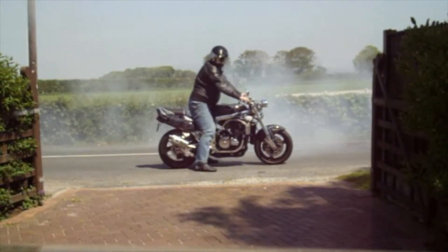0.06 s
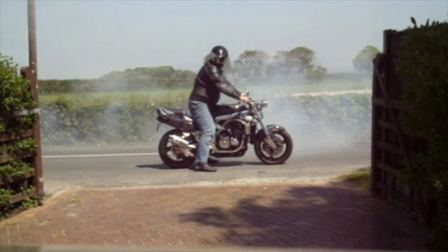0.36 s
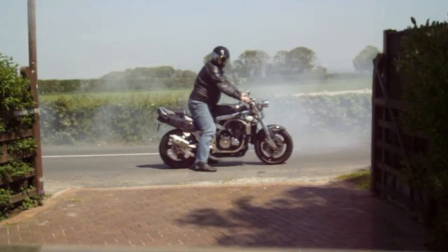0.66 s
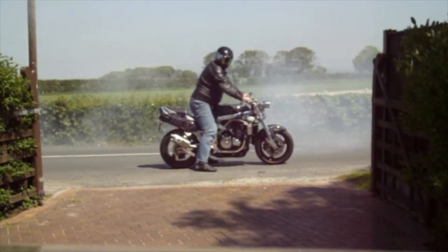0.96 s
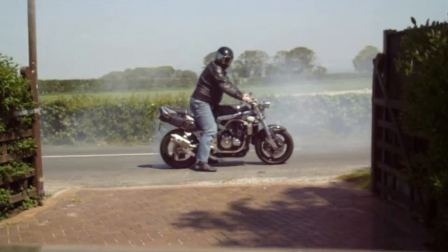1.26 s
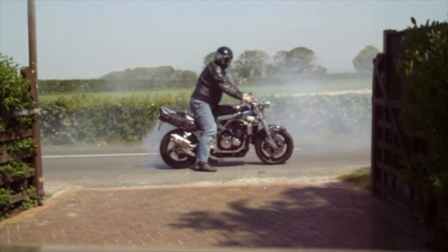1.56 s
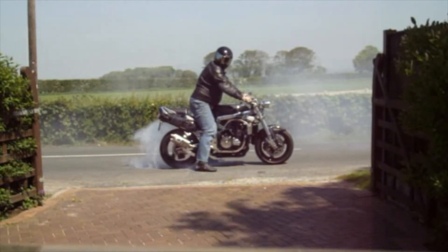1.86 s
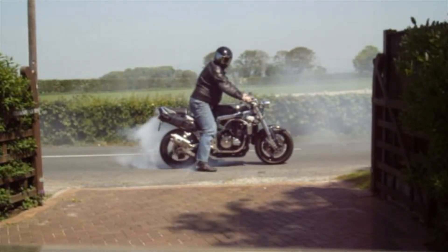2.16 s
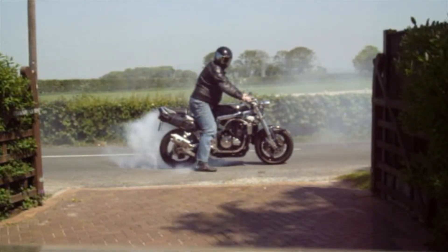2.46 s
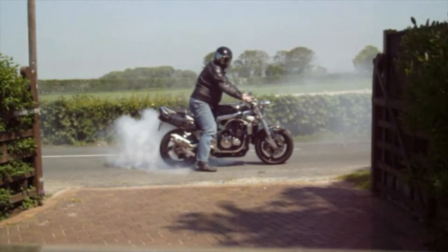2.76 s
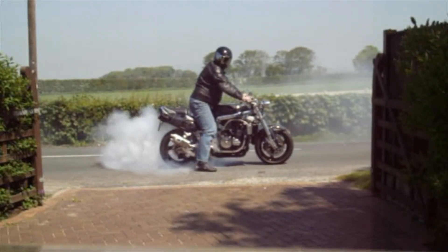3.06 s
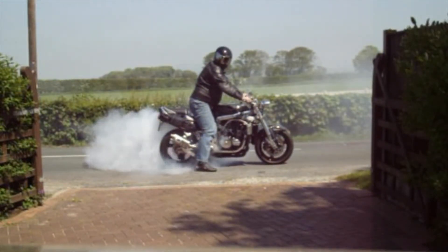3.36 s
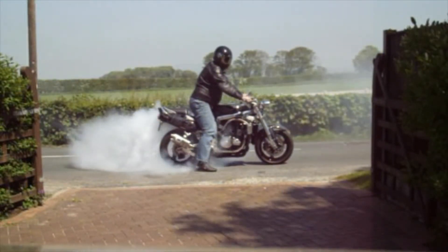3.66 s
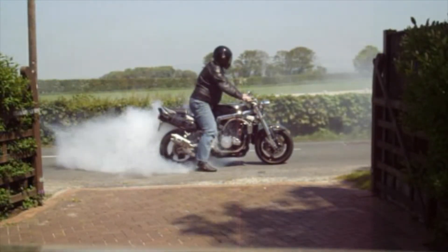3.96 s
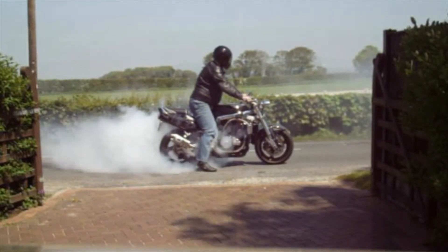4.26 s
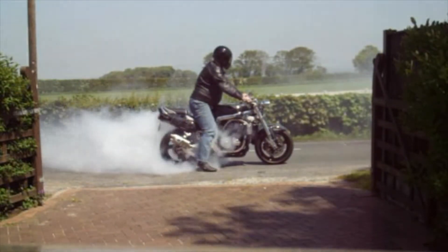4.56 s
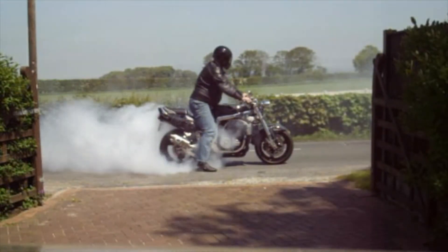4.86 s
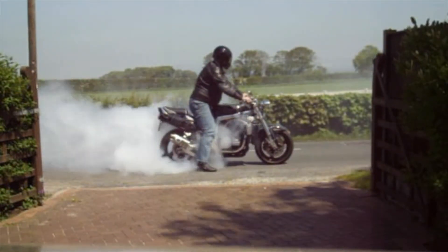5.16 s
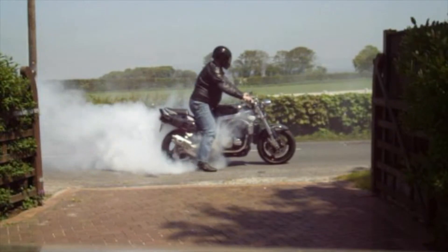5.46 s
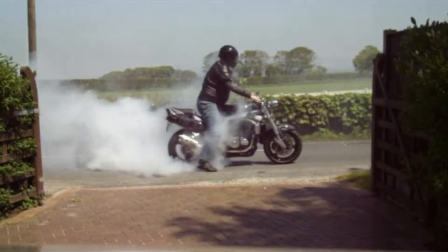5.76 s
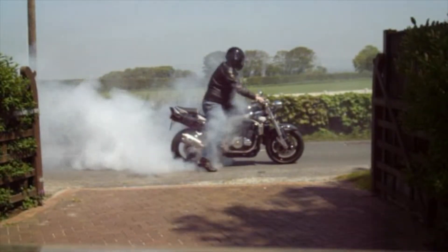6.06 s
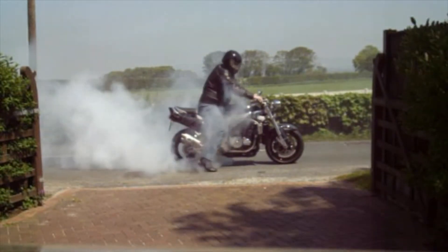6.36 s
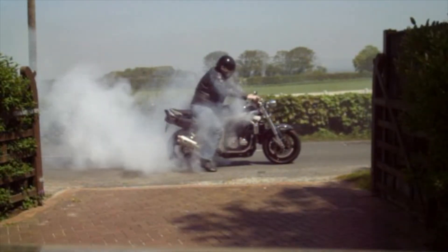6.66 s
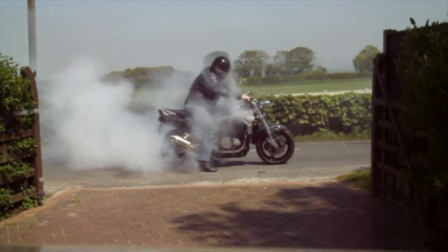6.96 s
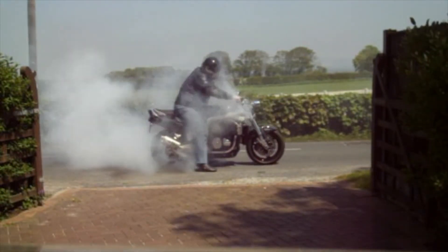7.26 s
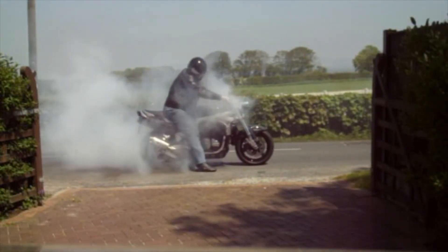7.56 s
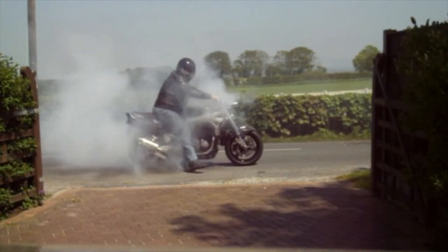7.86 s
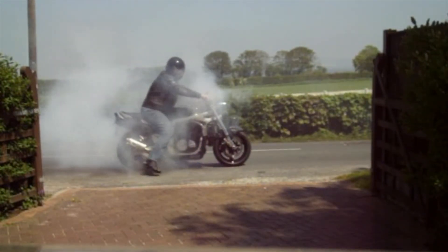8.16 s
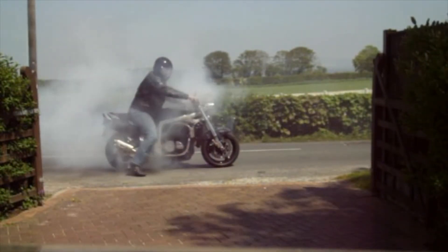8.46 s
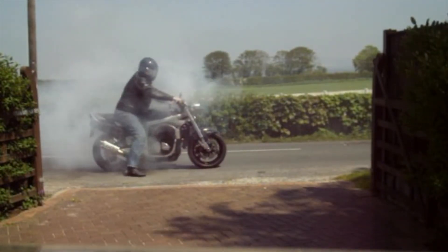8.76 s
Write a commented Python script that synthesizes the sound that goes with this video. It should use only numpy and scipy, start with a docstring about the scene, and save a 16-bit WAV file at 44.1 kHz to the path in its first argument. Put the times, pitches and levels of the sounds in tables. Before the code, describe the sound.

A four-cylinder motorcycle runs on an open road, a few metres from the microphone. It revs up sharply from idle, with one dry crack at about 0.5 seconds, and hesitates briefly. At 1 second the rear tyre starts spinning and the pitch climbs again. From about 2 seconds the exhaust holds a high, nearly steady, raspy note over rubber scrubbing on asphalt, which surges now and then and gradually grows. The loud peaks are squashed and slightly clipped. At 5.4 seconds the throttle shuts abruptly: the pitch falls, the exhaust breaks into separate thumps, gears whirr down and the valves rattle. By about 8 seconds the engine has settled into a lumpy idle that lasts to the end. A thin high whistle fades in around 7 seconds, a few short clanks come between 7.7 and 8.4 seconds, and a faint wavering squeal sounds from 8 to nearly 9 seconds.

```python
"""A four-cylinder motorcycle on a country road, a few metres from a camcorder's microphone.
It revs up with one dry crack; at 1 s the clutch bites and the rear tyre spins for four seconds,
the exhaust singing over rasping gas and scrubbing rubber. At 5.4 s the throttle shuts: single
firings thump the pipe, gears whirr down and the valve gear rattles. It ends in a lumpy idle, with
a thin whistle, a faint squeal and a few clanks. The camcorder limits and clips the peaks."""
import sys
import numpy as np
from scipy import signal
from scipy.fft import rfft, irfft
from scipy.io import wavfile
from scipy.ndimage import uniform_filter1d, minimum_filter1d

SR = 44100
rng = np.random.default_rng(int(sys.argv[2]) if len(sys.argv) > 2 else 0)


def to_wav(sig):
    """Store sig (one row per channel, or 1-D mono) as 16-bit WAV at the path in sys.argv[1].

    Samples outside -1..1 are clipped; the rate is SR.
    """
    pcm = np.clip(np.atleast_2d(sig), -1, 1) * 32767
    pcm = np.round(pcm).astype(np.int16)
    wavfile.write(sys.argv[1], SR, pcm.T)  # frames by channels


N = 392931
T = np.arange(N) / SR

OPEN_S, SHUT_S = 0.39, 5.44  # throttle
CLUTCH_S, CLUTCH_BITE_S = 1, 0.23
IDLE_HZ = 48.58

# squeal as the bike rolls back: time_s, level_db
SQUEAL_LEVELS = [(7.3, -83), (7.9, -44), (8.3, -41.5), (8.55, -38), (8.72, -35), (8.9, -41)]
# its modes: pitch_hz, width_hz, gain_db
SQUEAL_TONES = [(1017, 85, 8.5), (1120, 140, -4.5), (3110, 140, -5.5)]
# gear whirr carried by the casing: mesh_hz, level_db
CASING_RESPONSE = [(2300, -70), (2750, -46), (3200, -37), (3950, -44), (4600, -39), (5600, -62)]
# sharp knocks: start_s, strength_db, decay_s, relative_tick_db
KNOCK_HITS = [(.503, 3.5, 0.00077, -13), (7.701, -21, 0.0074, -17), (7.925, -10.5, 0.0065, -27),
              (8.083, -14, 0.0042, -19), (8.303, -9, 0.0098, -27), (8.342, -13.5, 0.0084, -29)]
# body of a knock: frequency_hz, gain_db
KNOCK_SPECTRUM = [(200, 7), (800, 22.5), (1300, 12.5), (2500, 2), (5000, -4), (9500, -27)]
# valve gear and chain: frequency_hz, gain_db
RATTLE_SPECTRUM = [(100, -41.5), (400, 12), (800, 12.5), (1200, 9.5), (1600, -1.5), (2100, -2), (3100, -1),
                   (3600, -5.5), (4400, -4), (5600, -14.5), (6600, -15), (7700, -21), (9600, -24.5)]
# the rattle swells or ebbs briefly: centre_s, length_s, change_db
RATTLE_SURGES = [(5.53, .07, 2), (5.84, .18, 3), (7.13, .1, -3), (7.33, .13, 2), (7.42, .04, -5),
                 (7.57, .12, 2.5)]
# rubber on asphalt: frequency_hz, gain_db
SCRUB_SPECTRUM = [(30, -20.5), (150, -17.5), (260, -5), (370, 8), (520, -1.5), (780, -6), (1020, -3.5),
                  (1400, -4.5), (3000, -36)]
# the tyre grabs and tears loose: centre_s, length_s, scrub_boost_db, engine_boost_db
TYRE_GRABS = [(1.28, .17, 15, 2), (1.63, 0.22, 10, 1), (3.3, 0.093, 5.5, 0), (3.6, 0.083, 7, .6),
              (3.9, 0.33, 5, 1.2)]
# gas rasp under throttle: frequency_hz, gain_db
RASP_SPECTRUM = [(120, -7.5), (400, 8), (700, 3.5), (1100, 9.5), (1500, -5.5), (1900, -0.5), (2300, 2.5),
                 (2450, 2.5), (2610, 6.5), (2850, -2), (3800, -5), (4700, -1), (5700, -9.5), (6600, -8.5),
                 (7600, -19), (9600, -20.5)]
# pipe boom that the partials sweep through off throttle: frequency_hz, level_db
BOOM_RESPONSE = [(48, -25), (70, -30), (100, -23.5), (155, -13), (185, -17.5), (222, -19), (275, -21.5),
                 (330, -18), (400, -9), (450, -13.5), (500, -25), (720, -22), (1100, -31)]
# partials of the boom: firing_multiple, gain_db, idle_change_db, pickup_change_db
BOOM_TONES = [(1, 2, 1, -8), (1.5, -4.5, -23, -19), (2, -4, -1.5, 3), (3, -6.5, -12, -0.5),
              (4, -11.5, -2, 13.5)]
# the four cylinders off throttle: strength_db, header_delay_s
CYLINDER_KICKS = [(-2.5, 0), (1, 0.0026), (-3, 0.00019), (2.7, 0.00066)]
# exhaust pipe when coasting fast, and at idle: frequency_hz, gain_db
COASTING_PIPE = [(15, -56), (35, -13), (60, -8.5), (115, 2.5), (170, 7), (225, -8.5), (280, 3.5), (330, 6),
                 (405, 13.5), (520, -11), (620, -3), (760, -23.5), (1050, -18.5), (1500, -49.5),
                 (4000, -56.5)]
IDLING_PIPE = [(15, -41), (55, -19.5), (90, -4), (160, 7.5), (200, -1.5), (255, 7.5), (320, 4.5),
               (420, 3.5), (520, -9.5), (680, -20), (1050, -13.5), (1500, -28), (4000, -64)]
# weaker orders from unequal cylinders: cycle_multiple, gain_db
WEAK_ORDERS = [(1, -28), (3, -29), (5, -23), (7, -31.5), (9, -25), (10, -31), (11, -31), (13, -29),
               (15, -30), (17, -33), (18, -38), (19, -39), (21, -34), (22, -39), (26, -40), (34, -34)]
# the silencer thins the bass in two steps, below about 150 Hz and 75 Hz: frequency_hz, gain_db
SILENCER_RESPONSE = [(62, -29.5), (77, -14), (100, -16.5), (140, -14.5), (154, 0.5), (230, -1),
                     (2000, -4.5)]
# pipe resonances under throttle: centre_hz, width_hz, gain_db
PIPE_MODES = [(154.6, 10, -27.5), (174.6, 45, -27.5), (244, 17, -17.5), (275.9, 18, -10), (307.7, 24.6, -9),
              (409, 84, -13.5), (448.5, 74, -10.5), (506.4, 78, -20), (585.2, 34, -17), (625.9, 19, -18.5),
              (687, 97, -23.5), (782, 40, -26.5), (924, 81, -29), (985, 93, -21), (1089, 50, -28.5),
              (1233, 28, -36), (1495, 120, -29.5)]
# partials of the exhaust note: firing_multiple, gain_db, flutter_db
NOTE_PARTIALS = [(.5, -7, 1.5), (1, 0, .26), (1.5, -12, .8), (2, 0, .5), (3, 0, 1.3), (3.5, -5, 2.2),
                 (4, 0, 2.2), (5, -7, 2.2), (6, -8, 2.2)]
# the rider opens up, hesitates, and opens further as the clutch bites: time_s, firing_hz
REV_UP_RATES = [(.08, 52.96), (.24, 83.7), (.41, 183.4), (.53, 227.2), (.6, 243.3), (.7, 249.4),
                (.82, 241.5), (.92, 231), (1.02, 228), (1.1, 240.6), (1.45, 282.9)]
# the throttle is held while the tyre spins: time_s, firing_hz
BURNOUT_RATES = [(1.8, 300), (1.97, 304.7), (2.16, 302.7), (2.38, 305.2), (3.13, 307.3), (3.17, 310),
                 (3.59, 308.7), (3.8, 311.1), (4.1, 305.5), (4.39, 307.7), (4.87, 311.7), (5.42, 314)]


def undb(db):
    """Decibels to gain."""
    return 10 ** (np.asarray(db) / 20)


def curve(rows, at=T):
    """Read a two-column table along straight lines, by default over time."""
    return np.interp(at, *np.transpose(rows))


def swells(rows, column=2):
    """A bell-shaped swell for each (centre_s, length_s, ...) row, as high as the given column."""
    return sum(row[column] * np.exp(-(2 * (T - row[0]) / row[1]) ** 2) for row in rows)


def unit(x):
    """Scale to rms 1."""
    return x / np.sqrt(np.mean(x ** 2))


def steady(x, size=6000):
    """Scale to a running rms of 1."""
    return x / np.sqrt(uniform_filter1d(uniform_filter1d(x ** 2, size), size) + 1e-12)


def walk(rate_hz):
    """Smooth random wander, spread near 1."""
    knots = rng.standard_normal(8192)
    return 1.2 * np.interp(T * rate_hz, np.arange(len(knots)), knots)


def colour(x, response, size=4096):
    """Minimum-phase filter through (frequency_hz, gain_db) points."""
    hz, db = np.transpose(response)
    grid_hz = np.maximum(np.arange(size // 2 + 1) * SR / size, 1)
    gain = undb(np.interp(np.log(grid_hz), np.log(hz), db))
    cepstrum = irfft(np.log(gain))
    cepstrum[1:size // 2] *= 2
    cepstrum[size // 2 + 1:] = 0
    impulse = irfft(np.exp(rfft(cepstrum)))
    return signal.fftconvolve(x, impulse)[:N]


def ring(turns, width_hz):
    """A wavering tone on the given phase, rms near 1."""
    return walk(width_hz) * np.cos(2 * np.pi * turns) + walk(width_hz) * np.sin(2 * np.pi * turns)


def per_cycle(firings, orders, db, size=4096):
    """A wave that repeats every four firings; 0 dB is an order of rms 1."""
    lines = np.zeros(size // 2 + 1, complex)
    lines[np.rint(orders).astype(int)] = undb(db) * np.exp(2j * np.pi * rng.random(len(db)))
    place = firings / len(CYLINDER_KICKS) % 1 * size
    return np.interp(place, np.arange(size), irfft(lines) * size / np.sqrt(2))


def whistle(pitch_hz=7375, level_db=-59):
    """A thin whistle fades in as the engine nears idle."""
    fade_in = np.interp(T, [6.6, 7.4], [0, 1])
    return undb(level_db) * fade_in * np.sin(2 * np.pi * pitch_hz * T + walk(21))


def squeal():
    """Three wavering modes squeal faintly as the bike rolls back."""
    modes = sum(undb(db) * ring(hz * T, width_hz) for hz, width_hz, db in SQUEAL_TONES)
    return modes * undb(curve(SQUEAL_LEVELS))


def gear_whirr(firings, hz, pickup, teeth_per_firing=21.5):
    """Meshing gears follow the engine up and down, heard through the casing."""
    level_db = curve(CASING_RESPONSE, teeth_per_firing * hz) - 7 * pickup
    return ring(teeth_per_firing * firings, width_hz=480) * undb(level_db)


def knocks():
    """Short dry cracks and clanks from the bike, each with its own share of bright tick."""
    clank = unit(colour(rng.standard_normal(N), KNOCK_SPECTRUM))
    tick = rng.standard_normal(N)
    out = 0
    for start_s, strength_db, decay_s, tick_db in KNOCK_HITS:
        envelope = (T >= start_s) * np.exp(-np.abs(T - start_s) / decay_s)
        out += undb(strength_db) * envelope * (clank + undb(tick_db) * tick)
    return out / 2


def valve_rattle(firings, hz, pickup, idle_db=-28.5, db_per_octave=1.45, scatter_db=4):
    """Valve gear and chain tick unevenly, once a firing, over a hiss that grows with speed."""
    strength = undb(scatter_db * rng.standard_normal(8192))[firings.astype(int)]
    ticks = 0.55 * strength * np.exp(-(firings % 1))
    rattle = steady(colour((1 + ticks) * rng.standard_normal(N), RATTLE_SPECTRUM))
    level_db = idle_db + db_per_octave * np.log2(hz / IDLE_HZ) - 0.5 * pickup + swells(RATTLE_SURGES)
    return rattle * undb(level_db + 0.62 * walk(25))


def tyre_scrub(load, cold_db=-32.5, heat_db_per_s=0.88):
    """Rubber scrubs on asphalt, gripping and letting go, louder as it heats up."""
    grip_db = 1.5 * walk(16) + swells(TYRE_GRABS)
    level_db = cold_db + heat_db_per_s * (T - CLUTCH_S) + grip_db
    scrub = unit(colour(rng.standard_normal(N), SCRUB_SPECTRUM))
    return np.sqrt(load) * scrub * undb(level_db)


def gas_rasp(firings, load, free_db=-31, load_db=2.5):
    """Gas hiss pulses with the firings and engine clatter repeats every cycle; both grow with load."""
    orders = np.arange(12, 110)
    orders_db = -7 * (orders % 2) - .12 * orders  # odd and high orders are weaker
    clatter = unit(per_cycle(firings + .005 * walk(90), orders, orders_db))
    pulsing = 1 + 0.13 * np.cos(2 * np.pi * firings) + 0.061 * np.cos(np.pi * firings)
    hiss = unit(pulsing * rng.standard_normal(N))
    level_db = free_db + load_db * load + swells(TYRE_GRABS, column=3)
    return steady(colour(hiss + clatter, RASP_SPECTRUM)) * undb(level_db + .6 * walk(40))


def pipe_boom(firings, hz, lumpy, pickup, sputter_db=2.2):
    """Partials ring the pipe, sputtering; the upper ones weaken as the engine turns lumpy."""
    turns = firings + .03 * walk(70)
    out = 0
    for multiple, db, idle_db, pickup_db in BOOM_TONES:
        level_db = curve(BOOM_RESPONSE, multiple * hz) + db + idle_db * lumpy ** 2 + pickup_db * pickup
        out += undb(level_db + sputter_db * walk(45)) * np.sin(2 * np.pi * multiple * turns)
    return np.sqrt(2) * out


def reflections(x, echoes=((.0039, .4), (.0077, .3), (.0123, .2))):
    """The silencer and the road return each thump to the microphone a few milliseconds later."""
    return x + sum(gain * np.interp(T - lag_s, T, x, left=0) for lag_s, gain in echoes)


def exhaust_thumps(firings, hz, lumpy, pickup, scatter_db=4.5, jitter_s=0.00058):
    """Each firing kicks the pipe; the cylinders burn less evenly and punctually as the engine slows."""
    count = np.arange(1, int(firings[-1]))
    fire_s = np.interp(count, firings, T)
    uneven = np.interp(fire_s, T, lumpy) ** 0.62
    strength_db, header_s = np.array(CYLINDER_KICKS)[count % len(CYLINDER_KICKS)].T
    burn_luck, timing_luck = rng.standard_normal((len(count), 2)).T
    contrast = np.where(fire_s < OPEN_S, .35, 1)  # the opening throttle feeds the cylinders more alike
    strength = undb(contrast * (strength_db + uneven * scatter_db * burn_luck))
    arrival_s = fire_s + header_s + jitter_s * uneven ** 2 * timing_luck
    samples = np.clip(arrival_s * SR, 0, N - 1).astype(int)
    kicks = steady(np.bincount(samples, strength, N))
    # turbulent gas trails every kick
    trail = np.interp(firings // 1, count, strength) * np.exp(-(firings % 1))
    drive = kicks + lumpy ** 2 * steady(trail * rng.standard_normal(N))
    idling = np.interp(T, [7.1, 7.8], [0, 1])
    pipe = (1 - idling) * colour(drive, COASTING_PIPE) + idling * colour(drive, IDLING_PIPE)
    level_db = -19 + 6.5 * lumpy + 3.5 * pickup
    return steady(reflections(pipe)) * undb(level_db) + pipe_boom(firings, hz, lumpy, pickup)


def pipe_gain(hz):
    """How strongly the pipe's resonances sound a partial of this frequency."""
    grid_hz = np.arange(2000)
    power = sum((undb(db) / (1 + (2 * (grid_hz - centre_hz) / width_hz) ** 2)) ** 2
                for centre_hz, width_hz, db in PIPE_MODES)
    return np.interp(hz, grid_hz, np.sqrt(power))


def exhaust_note(firings, hz, load):
    """At high revs the firings merge into a clean note with weaker orders between its partials."""
    turns = firings + 0.0042 * walk(80)
    note = 0
    for multiple, db, flutter_db in NOTE_PARTIALS:
        gain = pipe_gain(multiple * hz) * undb(db + flutter_db * walk(35))
        note += gain * np.sin(2 * np.pi * multiple * turns)
    orders = per_cycle(firings + 0.0036 * walk(60), *np.transpose(WEAK_ORDERS))
    orders_db = -10 + 0.5 * load + swells(TYRE_GRABS, column=3) + 3.5 * walk(70)
    return np.sqrt(2) * note + colour(orders, SILENCER_RESPONSE) * undb(orders_db)


def firing_rate(flare_hz=312.5, stall_hz=20, rundown_s=1.02):
    """The rider sets the speed; throttle shut, friction slows the engine until the idle catches it."""
    ridden_hz = curve(list(REV_UP_RATES) + list(BURNOUT_RATES))
    coasting_hz = stall_hz + (flare_hz - stall_hz) * np.exp(-np.maximum(T - SHUT_S, 0) / rundown_s)
    return np.where(T < SHUT_S, ridden_hz, np.maximum(coasting_hz, IDLE_HZ))


def scene():
    """At the roadside, the throttle fades thumps and rattle into note, rasp and tyre, and back."""
    hz = firing_rate() * (1 + .0015 * walk(30))
    firings = np.cumsum(hz) / SR
    opening = np.clip((T - OPEN_S) / 0.166 + .5, 0, 1)
    shutting = np.clip((SHUT_S - T) / 0.049 + .5, 0, 1)
    throttle = opening * shutting
    load = np.clip((T - CLUTCH_S) / CLUTCH_BITE_S, 0, 1)
    pickup = T < CLUTCH_S  # the engine gathers speed, running free
    lumpy = np.minimum(70 / hz, 1)  # fully lumpy below 70 firings a second
    driven = exhaust_note(firings, hz, load) + tyre_scrub(load) + gas_rasp(firings, load)
    coasting = exhaust_thumps(firings, hz, lumpy, pickup) + valve_rattle(firings, hz, pickup)
    background = gear_whirr(firings, hz, pickup) + squeal() + whistle() + knocks()
    return (background + np.sqrt(throttle) * driven + np.sqrt(1 - throttle) * coasting)[None]


def record(dry, ceiling=0.66, clip_level=.51, window_samples=1300, top_hz=9900):
    """The camcorder's limiter holds the level; what gets past is flattened, and the top is cut."""
    peak = -minimum_filter1d(-np.abs(dry), window_samples)
    held = dry * uniform_filter1d(ceiling / np.maximum(peak, ceiling), window_samples)
    clipped = held / (1 + (np.abs(held) / clip_level) ** 20) ** (1 / 20)
    lowpass = signal.ellip(10, .2, 80, top_hz, fs=SR, output="sos")
    return signal.sosfilt(lowpass, clipped, axis=-1)


dry = scene()
out = record(dry)
to_wav(out)
```